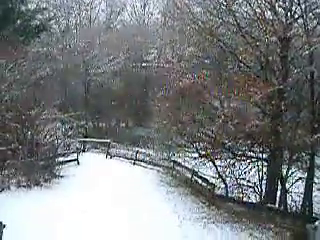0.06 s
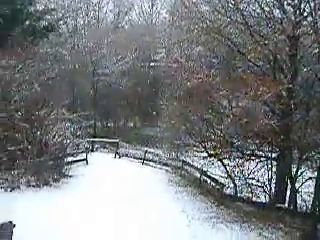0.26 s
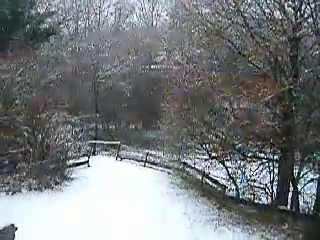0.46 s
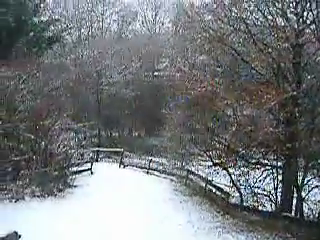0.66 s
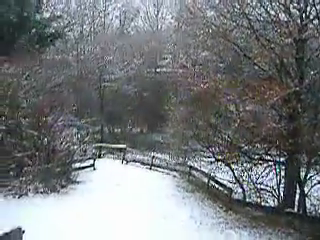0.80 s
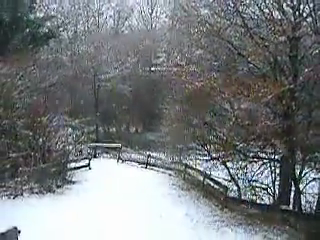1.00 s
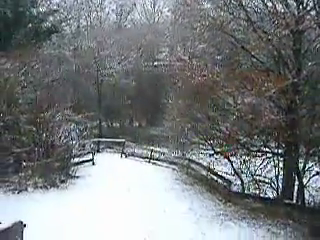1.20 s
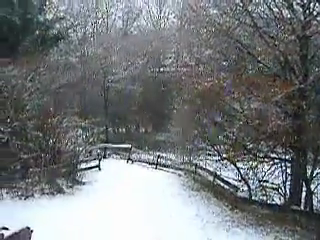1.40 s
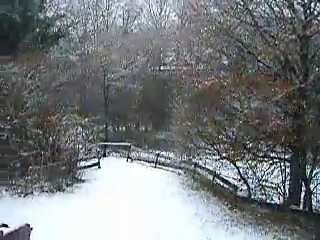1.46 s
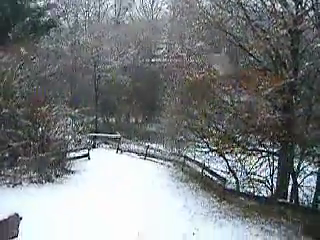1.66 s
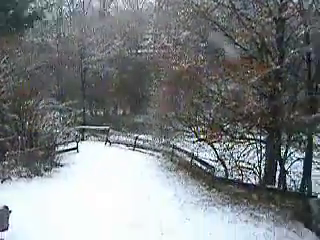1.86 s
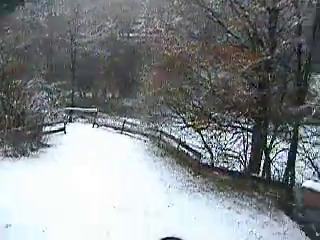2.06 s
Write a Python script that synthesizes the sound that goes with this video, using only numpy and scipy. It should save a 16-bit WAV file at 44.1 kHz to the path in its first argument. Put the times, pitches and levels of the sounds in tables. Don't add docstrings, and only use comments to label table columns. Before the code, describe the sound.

Steel stair treads are struck hard three times, short hollow rings between quick rattling taps and uneven shoe scuffs; snowy open air, quiet hiss, low wind rumble and a thin high whine on a small camera.

```python
import sys
import numpy as np
from scipy import signal
from scipy.fft import rfft, irfft
from scipy.io import wavfile

SR = 44100
rng = np.random.default_rng(int(sys.argv[2]) if len(sys.argv) > 2 else 0)


def amplitude_ratio(level_db):
    exponent = np.asarray(level_db, float) / 20
    return 10 ** exponent


def wav_out(sig):
    wavfile.write(sys.argv[1], SR, np.round(np.clip(np.atleast_2d(sig).T, -1, 1) * 32767).astype(np.int16))


N = 92610


def read(points, hz):
    f, value = np.transpose(points)
    return np.interp(np.log(hz + 1), np.log(f + 1), value)


def evened(x):
    return x / np.sqrt(np.mean(x ** 2) + 1e-20)


def low_cut(f, hz):
    return 1 / (1 + (hz / (f + 1)) ** 4)


def high_cut(f, hz, order=4):
    return 1 / (1 + (f / hz) ** order)


def coloured_noise(length, gain):
    spectrum = rfft(rng.standard_normal(length))
    return irfft(spectrum * gain(np.fft.rfftfreq(length, 1 / SR)), length)


def add(mix, s, sound):
    part = mix[round(s * SR):][:len(sound)]
    part += sound[:len(part)]


# f/Hz, level/dB per Hz
HISS = [(100, -4.5), (300, 0.5), (700, -6), (1500, -8.5), (3000, -15), (6300, -16.5), (7900, -15.5),
        (8600, -30)]
# t/s, level/dB
WIND = [(0, -56), (.4, -54), (.65, -56.5), (.9, -58), (1.2, -54), (1.5, -53), (1.8, -53), (2.1, -51)]
# f/Hz, level/dB
WHINE = [(7888, -62), (8112, -65), (7594, -71)]


def air():
    t = np.arange(N) / SR
    hiss = coloured_noise(N, lambda f: amplitude_ratio(read(HISS, f)) * (f < 9500) * (f > 100))
    gust_db = 0 * evened(coloured_noise(N, lambda f: high_cut(f, 1.3, 2)))
    rumble = coloured_noise(
        N, lambda f: (f / 25) ** 2 / (1 + (f / 25) ** 2) * high_cut(f, 58.8, 1.68))
    wind_db = np.interp(t, *np.transpose(WIND)) + 8 + gust_db
    whine = np.zeros(N)
    for hz, db in WHINE:
        whine += np.sqrt(2) * amplitude_ratio(db) * np.sin(2 * np.pi * (hz * t + rng.random()))
    return amplitude_ratio(-47.5) * evened(hiss) + amplitude_ratio(wind_db) * evened(rumble) + whine


def chatter(body):
    grains_per_s, grain_db = 900, 1
    out = np.zeros(N)
    for hz, width, db in body:
        slips = rng.random(N) < grains_per_s / SR
        force = amplitude_ratio(grain_db * np.minimum(rng.exponential(1, N), 5)) * rng.choice([-1, 1], N)
        band = signal.butter(2, [hz - width, hz + width], "band", fs=SR, output="sos")
        out += amplitude_ratio(db) * evened(signal.sosfilt(band, slips * force))
    return evened(out)


def stroke(s, length):
    progress = np.clip((np.arange(N) / SR - s) / length, 0, 1)
    return np.sin(np.pi * progress ** 0.88).clip(0) ** 0.55


# f/Hz, width/Hz, level/dB
BEAM = [(520.4, 85, -6.5), (809, 128, -1.5), (1085, 360, -6)]
PLATE = [(1667, 102, 0.5), (1960, 90, -2.5), (2380, 440, -4), (3190, 190, -15.5), (4080, 340, -16.5)]
# f/Hz, width/Hz, level/dB
RAIL = [(2140, 110, 1), (3100, 100, 4), (4000, 200, -3.5)]
# t/s, length/s, pressure level/dB, plate level/dB, grit level/dB
STROKES = [(0.202, 0.11, -39, 4.5, -14.5), (0.217, 0.035, -38.5, 1.5, -25), (0.292, 0.073, -44.5, -4, -38),
           (0.35, 0.047, -56, 1, -13), (0.44, 0.052, -54, -5, -10), (0.592, 0.067, -38.5, -0.5, -9),
           (0.667, 0.036, -38.5, 2, -7), (0.73, 0.11, -41.5, -4.5, -13.5), (0.782, .085, -49, 0.5, 0.5),
           (0.828, 0.19, -48, 1.5, -6.5), (1.503, 0.031, -40.5, -1.5, -11), (1.647, 0.14, -43, 0, -11),
           (1.702, 0.05, -42, 2, -8), (1.754, 0.0088, -29, 1, -0.5), (1.782, 0.037, -43, -10, -16),
           (1.847, 0.036, -43, -5, -23), (1.877, 0.7, -47, -4.5, -15)]
# t/s, length/s, level/dB
SQUEAK = (.605, 0.052, -38)


def scrape():
    beam, plate, out = chatter(BEAM), chatter(PLATE), np.zeros(N)
    grit = evened(coloured_noise(N, lambda f: low_cut(f, 2800) * high_cut(f, 7500)))
    for s, length, db, plate_db, grit_db in STROKES:
        friction = beam + amplitude_ratio(plate_db) * plate + amplitude_ratio(grit_db) * grit
        out += amplitude_ratio(db) * stroke(s, length) * friction
    squeak_s, squeak_length, squeak_db = SQUEAK
    return out + amplitude_ratio(squeak_db) * stroke(squeak_s, squeak_length) * chatter(RAIL)


def modes(table, detune=1, late=0, rise_s=0.0005):
    hz, db, t60 = np.transpose(table)[:, :, None]
    hz = hz * detune
    t = np.arange(SR // 2) / SR
    slow = hz < 580
    rise = 1 - np.exp(-(t / np.where(slow, 0.013, rise_s)) ** np.where(slow, 2.8, 2))
    return (rise * amplitude_ratio(db - 60 * t / t60) * np.sin(2 * np.pi * hz * (t + late))).sum(0)


# f/Hz, level/dB
TICK_COLOUR = [(3000, 9.5), (4500, 5.5), (6200, 4.5), (7500, 8.5), (8500, -3.5)]


def tick():
    t, peak_s = np.arange(1024) / SR, 0.00069
    noise = coloured_noise(1024, lambda f: amplitude_ratio(read(TICK_COLOUR, f)) * low_cut(f, 2270))
    return evened(noise) * (t / peak_s) * np.exp(1 - t / peak_s)


def thud(db, hz=420):
    t = np.arange(2048) / SR
    return -amplitude_ratio(db) * np.sin(2 * np.pi * hz * t) * np.exp(-t / 0.002)


# f/Hz, level/dB, t60/s
KNOCK = [(691.6, 3, 0.034), (776, 9, 0.034), (830, -4, 0.065), (1240, -9, 0.051)]
CLACK = [(1623, -4, 0.029), (1797, 8, 0.01), (2052, 2.5, 0.014), (2900, -4, 0.007)]
# t/s, knock level/dB, clack level/dB, tick level/dB, ring level/dB
TAPS = [(.107, -44.5, -8, -2, -22), (.2203, -19.5, -5.5, -2.5, -10.5), (.2503, -28, -12, 3.5, -40),
        (.3218, -12, -15.5, -17.5, -13), (.338, -13.5, -9, -17.5, -12.5), (.3558, -18, -6.5, -10.5, -20),
        (.4085, -10.5, -15, -15, -15), (.4413, -12.5, -16, -20, -45), (.448, -39.5, 4, 5, -32),
        (.489, -16.5, -14, -30.5, -29), (.531, -29, -15.5, -29, -29), (.597, -15, -7.5, -7.5, -24),
        (.676, -28, -14.5, -1, -26.5), (.6805, -24.5, -6.5, -5, -38), (.6885, -35.5, 6, 1.5, -29.5),
        (.751, -26, -8, -20, -7)]
LATE_TAPS = [(1.117, -28.5, -11, -16, -32), (1.334, -41, 3, -22, -12), (1.347, -47.5, 5.5, -0.5, -31),
             (1.4925, -16.5, -11, -25.5, -50), (1.5085, -30, -2, -11, -46), (1.598, -46.5, 5, 8.5, -25),
             (1.632, -31.5, -6.5, -12, -16.5), (1.682, -39.5, 3, -13, -15), (1.709, -24.5, -16, -17, -25),
             (1.715, -22, -14, -19, -27), (1.7215, -24.5, -11, -12, -29), (1.727, -25.5, -10, -5.5, -41),
             (1.748, -37, 13, 9.5, -31), (1.7568, -25.5, -2, -4.5, -41), (1.7865, -37, -2.5, -3, -23),
             (1.8415, -26.5, -4, 5.5, -28), (1.869, -41, -19, -28, -30), (1.936, -44, -20, -2, -20)]
# t/s, f/Hz, level/dB, t60/s
PINGS = [(.4485, 2960, -33, .075), (1.634, 4400, -42, .04), (1.021, 1945, -25, .14),
         (1.551, 1950, -33, .14), (.2505, 2920, -27, .05), (1.85, 212, -46, .7)]
# t/s, f/Hz, level/dB, t60/s
SPOTS = [(0.2093, 1820, -25.5, .03), (.2148, 1650, -18, 0.023), (.2205, 826.5, -18.5, 0.056),
         (0.2193, 1150, -22.5, 0.036), (0.2265, 2900, -26, .02), (0.2273, 772, -22, 0.029),
         (0.2486, 1677, -17, .05), (0.2552, 1684, -17.5, 0.024), (.2695, 2050, -26, 0.026),
         (.669, 2100, -33, .03), (0.6878, 3950, -25.5, 0.021), (1.334, 974, -28, 0.019),
         (1.507, 1220, -25, 0.024), (1.692, 1684, -34.5, .04), (1.6955, 1690, -29, 0.027),
         (1.7209, 1640, -30, 0.036), (1.726, 1680, -36, .04), (1.7572, 2140, -17, 0.019),
         (1.786, 1113, -30.5, 0.035), (1.8435, 658, -27, 0.098), (1.8425, 860, -20.5, 0.039),
         (1.8425, 1780, -20.5, 0.016), (1.868, 1750, -37.5, .03)]
# t/s, level/dB, f/Hz
BUMPS = [(0.681, -25.5, 274), (1.7427, -18, 420), (1.7555, -18.5, 286), (1.8428, -22, 316)]


def taps():
    out = np.zeros(N)
    frame = [(TREAD_A[0][0], 0, 0.26)]
    for s, db, clack_db, tick_db, ring_db in list(TAPS) + list(LATE_TAPS):
        spot = 1 + 0.015 * rng.standard_normal((8, 1))
        knock = 0.5 * modes(KNOCK, spot[:4], rise_s=0.0018)
        clack = amplitude_ratio(clack_db + 2.5) * modes(CLACK, spot[4:])
        ring = amplitude_ratio(ring_db) * modes(frame, late=s - BLOWS[0][0])
        add(out, s, -amplitude_ratio(db) * (knock + clack + ring))
        add(out, s, amplitude_ratio(db + tick_db + 5) * tick())
    for s, *mode in list(PINGS) + list(SPOTS):
        add(out, s, -modes([mode]))
    for s, db, hz in BUMPS:
        add(out, s, thud(db, hz))
    return out


# f/Hz, level/dB, t60/s
TREAD_A = [(528.4, 6.5, 0.11), (645, -6, 0.16), (792, -8.5, 0.094), (772, -5.5, 0.16), (1160, -10.5, 0.16),
           (1410, -4, 0.059), (1663, 2, 0.03), (2050, -3.5, 0.027)]
TREAD_B = [(526.1, 0, 0.2), (665, -12, 0.11), (755, -7, 0.07), (880, -3.5, 0.084), (1023, -22, 0.11),
           (1190, -16, 0.12), (1520, -14, 0.073), (1723, -2, 0.035), (1776, 1.5, 0.011), (2256, 4, 0.012),
           (2690, 1, 0.012), (2920, -17.5, 0.071), (4380, -28, 0.086), (5210, -26.5, 0.078)]
TREAD_C = [(516, 5, 0.17), (642, -8, 0.13), (738, 1, 0.052), (804, 2, 0.051), (1010, -16.5, 0.13),
           (1176, -8, 0.06), (1630, -17, 0.06), (1705, -5.5, .049), (2550, 5, 0.0071), (3130, -26, .04),
           (2880, -6, 0.0082), (2240, -12.5, 0.034)]
# t/s, level/dB, tick level/dB, crack level/dB, thud level/dB
BLOWS = [
    (0.3027, -12.5, -7, -5.5, -13.5),
    (1.0192, -10, -8.5, -8.5, -18.5),
    (1.548, -12, -12.5, -31, -10.5),
]


def blows():
    out, t = np.zeros(N), np.arange(2048) / SR
    fade = np.hanning(4096)[2048:]
    for (s, db, tick_db, crack_db, thud_db), tread in zip(BLOWS, (TREAD_A, TREAD_B, TREAD_C)):
        grain = evened(coloured_noise(2048, lambda f: low_cut(f, 900) * high_cut(f, 2700)))
        crack = grain * np.exp(-t / 0.0035)
        rattle = grain[::-1] * np.exp(-t / 0.014) * fade
        add(out, s, -amplitude_ratio(db) * modes(tread))
        add(out, s, amplitude_ratio(db + tick_db) * tick())
        add(out, s, amplitude_ratio(db + crack_db) * crack + thud(thud_db))
        add(out, s, amplitude_ratio(db - 19.5) * rattle)
    return out


def scene():
    return (air() + scrape() + taps() + blows())[None]


def top_cut(x):
    return signal.sosfilt(signal.butter(12, 15800, fs=SR, output="sos"), x)


def record(dry):
    band_limit = signal.firwin(121, 8550, window=("kaiser", 7), fs=SR)[None]
    ceiling, offset = 0.765, -0.0031
    x = signal.oaconvolve(dry, band_limit, "same")
    return top_cut(np.clip(x + offset, -ceiling, ceiling))


dry = scene()
out = record(dry)
wav_out(out)
```